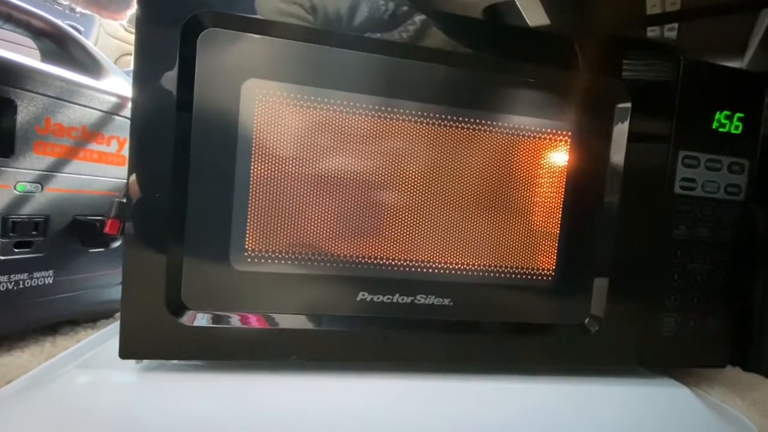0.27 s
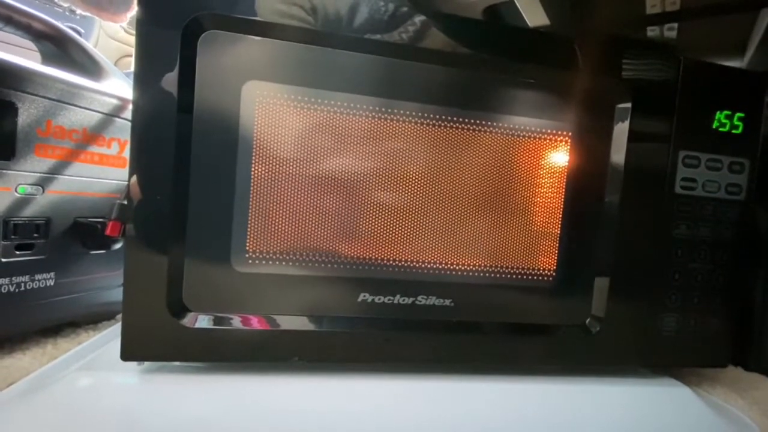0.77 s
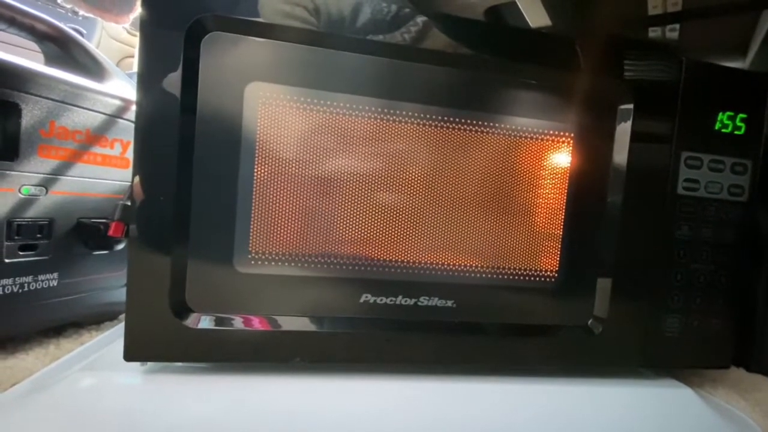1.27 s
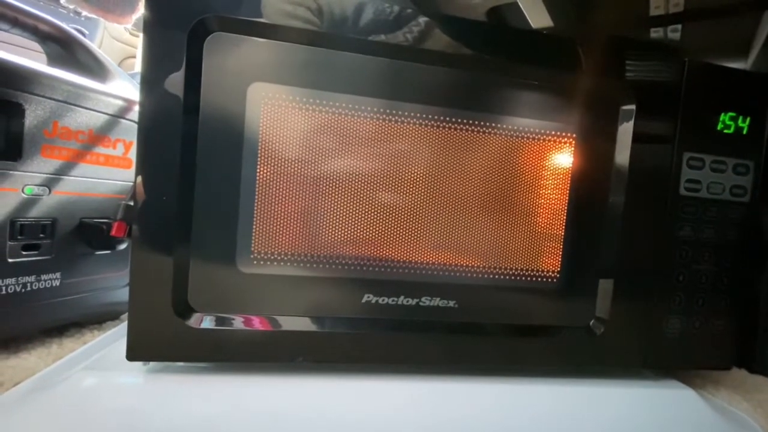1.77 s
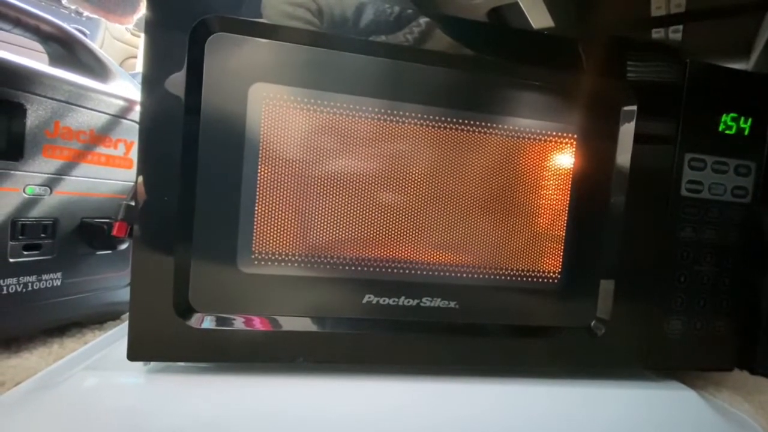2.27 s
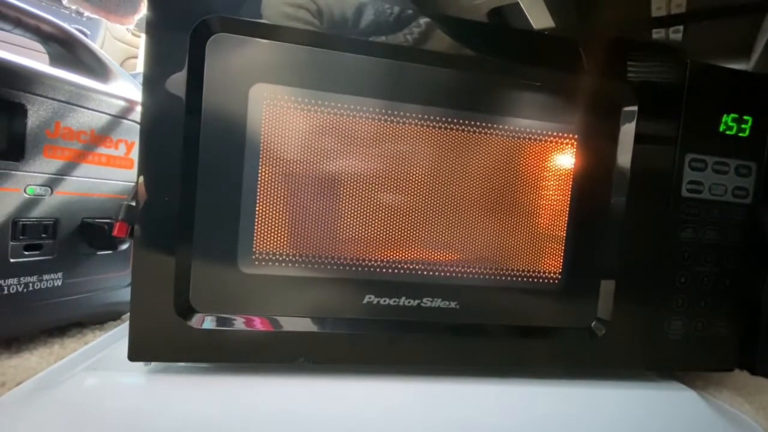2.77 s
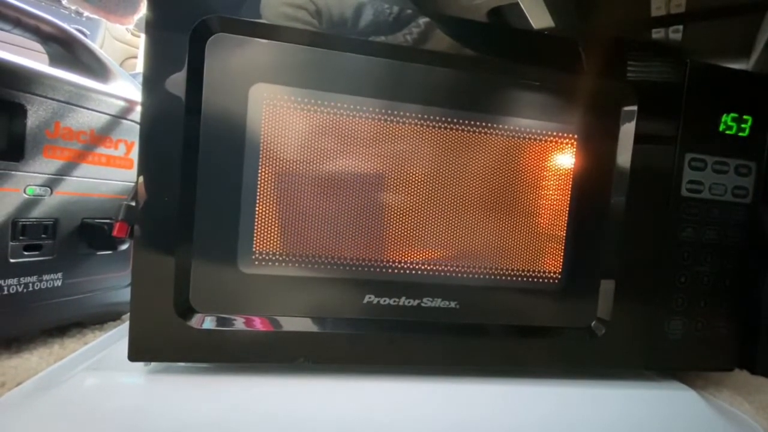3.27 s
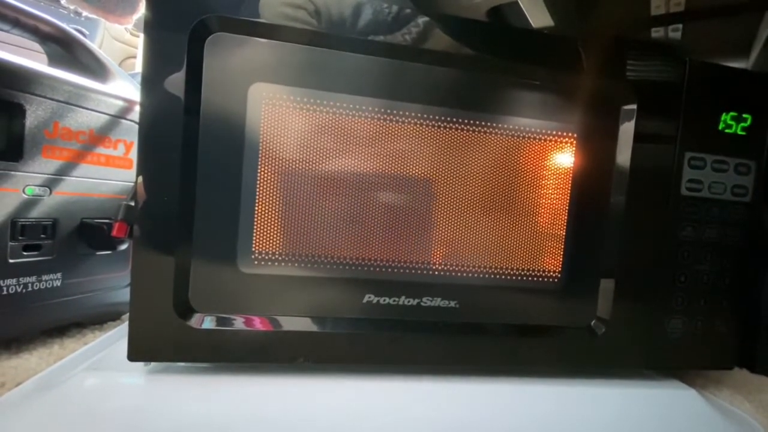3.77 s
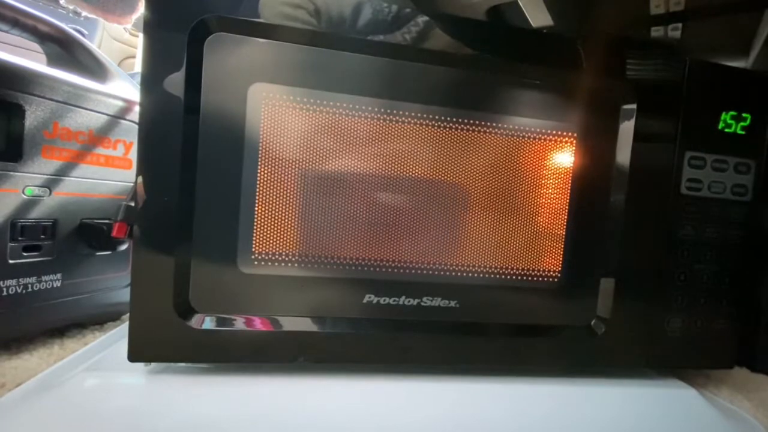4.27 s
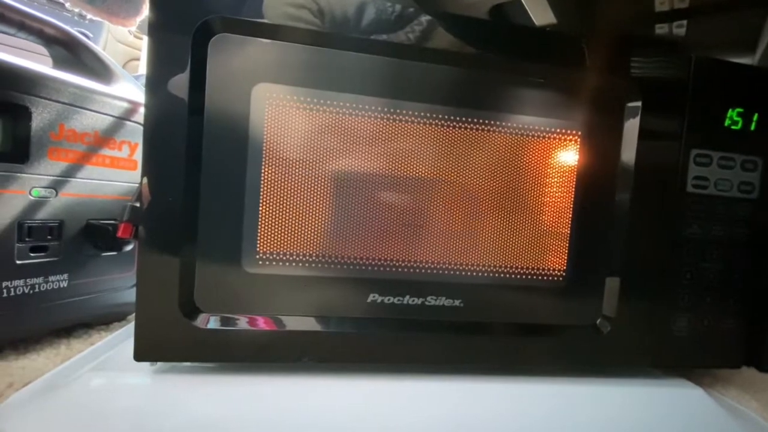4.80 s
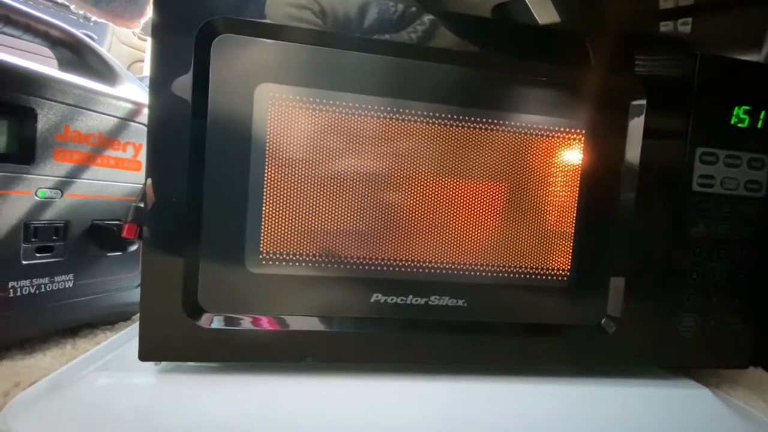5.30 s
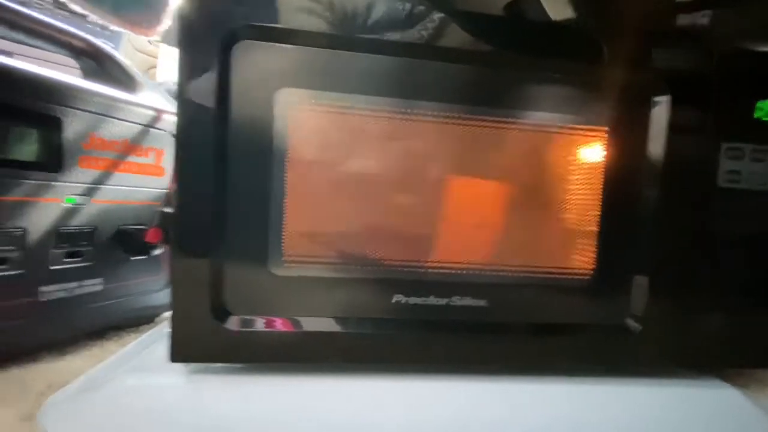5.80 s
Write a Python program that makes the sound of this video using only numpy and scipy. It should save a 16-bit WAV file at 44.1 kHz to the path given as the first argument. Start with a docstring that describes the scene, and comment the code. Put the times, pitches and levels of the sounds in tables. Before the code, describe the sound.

Steady low electrical hum and hollow fan airflow from a microwave fill a cramped van interior, unbroken from start to finish. Over it lie very quiet, bright rustles like fabric or thin wrapping near the microphone, a brief pair of dull clunks from the dish on the turntable just after two seconds, a few sharp little ticks, and a weaker clunk at about five and a half seconds as rustling returns.

```python
"""A microwave oven runs in a small van on a battery inverter, heard in stereo for six seconds.
From the start: a transformer hum built from sines, unsteady fan tones, air noise shaped from random noise,
and a faint rustle of tiny random grains that swells four times, first at about 1.5 s.
From 1.7 s come soft hollow thuds (fading sines with dull noise), from 2.1 s knocks of the dish on the
turntable (a rattle driving damped resonances), and from 2.2 s sharp ticks (short noise bursts)."""
import sys
import numpy as np
from scipy import signal
from scipy.fft import rfft, irfft, next_fast_len
from scipy.io import wavfile

SR = 44100
rng = np.random.default_rng(int(sys.argv[2]) if len(sys.argv) > 2 else 0)


def field_ratio(decibels):
    """Amplitude ratio for a level in dB (20 dB per decade); scalars and array-likes work."""
    return 10 ** (np.asarray(decibels, dtype=float) / 20)


def transcribe(u):
    """Save the signal u as a 16-bit wav file named by the first command-line argument.

    u: samples, shape (n,) or (channels, n), limited to [-1, 1]; the rate is SR.
    q: integer samples, one column per channel.
    """
    v = np.clip(np.atleast_2d(u).T, -1, 1)
    q = np.round(v * 32767).astype(np.int16)
    wavfile.write(sys.argv[1], SR, q)


N = 266628   # length [samples]

MAINS_HZ, FAN_HZ = 60.43, 129.59   # mains pitch, and the base pitch of the small fan
# In the tables, "left lead" is how far the left side's wave runs ahead of the right's.
# transformer and inverter hum:
# (multiple of mains, left level [dB rms], left minus right [dB], left lead [rad])
HUM_HARMONICS = [(1, -63.9, -5.5, 0.43), (2, -35.0, -1.5, -0.01), (3, -50.7, 1.1, 0.51),
                 (4, -63.0, -2.0, 0.16), (5, -64.0, -1.0, 2.13), (6, -60.1, 7.9, -2.65),
                 (8, -59.3, 2.5, 1.65), (22, -76.9, -2.5, 3.03), (25, -77.0, -0.2, -2.57),
                 (27, -80.3, -6.6, 0.74), (28, -70.8, 2.4, 0.76), (31, -72.5, 13.8, 0.75),
                 (32, -76.3, 5.0, -0.57), (76, -77.2, 20.7, 2.86)]
# small fast fan: (multiple of its base pitch, left level [dB rms], left minus right [dB], left lead [rad])
FAN_HARMONICS = [(6, -55.5, 4.5, -3), (7, -61, 8.5, 2.5), (8, -63, 20, -4), (10, -77, 8, 1),
                 (12, -75, 0.5, 0.5), (14, -74.5, 2, 1), (16, -70.5, 7, 0.6)]
# motor and blade tones:
# (pitch [Hz], left level [dB rms], left minus right [dB], left lead [rad], pitch waver [Hz])
MOTOR_TONES = [(64.79, -65.8, 2.0, -0.02, 0.1), (69.14, -58.6, -0.4, 0.42, 0.1),
               (71.06, -63.0, 0.5, 0.6, 0.1), (93.33, -44.9, 5.7, 0.39, 0.05),
               (97.56, -59.5, 1.3, 0.49, 0.05), (443.25, -60.3, 12.6, 0.71, 0.25),
               (453.07, -58.0, 6.6, 1.82, 1.0), (484.5, -60, 4, 1.95, 1.5),
               (497.06, -46.3, 2.8, 2.03, 0.55), (830, -69, 5, -2.9, 2.0), (968.69, -65.3, 2.5, -2.51, 1.4),
               (993.87, -64.2, 11.1, -2.66, 1.05), (1384.5, -63.3, 3.6, 0.63, 3.2),
               (1451.63, -74.5, 3.5, -0.86, 1.75), (1661.49, -74.1, 9.3, -1.11, 2.8),
               (1570.5, -81, 0, -0.5, 1.5), (1752, -83, 0, -0.5, 1.5), (1936.54, -71.5, 5.7, -0.88, 2.1)]
# air noise before its echoes: (pitch [Hz], left level [dB per Hz], left minus right [dB],
# left lead beyond the travel time [rad], likeness of the two sides [0-1])
AIR_COLOUR = [(31, -88, -1, 3, 0.9), (49, -71.5, 21, 2, 0.64), (69.5, -71.5, -6, -0.9, 0.77),
              (82, -77.5, -9.5, 0.5, 0), (114, -72.5, -2, 0.5, 0.83), (153, -70, 4.5, -0.25, 0.67),
              (202, -69, -2, 0.16, 0.87), (263, -63, -0.8, 0.91, 0.93), (307, -68.0, 5, 1.2, 0.97),
              (400, -70, 3.5, 1.04, 0.98), (443, -70, 5, 0.4, 1), (546, -66, 2.5, 0.68, 1),
              (666, -68, 7.5, 1.52, 0.95), (714, -72.5, 0, 0.65, 0.92), (765, -75.5, 3, 0.67, 0.91),
              (838, -75.5, 4.5, 0.9, 0.84), (950, -79, 6, -0.2, 0.72), (1060, -77, 12.5, -0.1, 0.8),
              (1275, -81, 0, -0.65, 0.81), (1505, -91.5, 3, -0.9, 0.14), (1560, -87, 8, -0.2, 0.36),
              (1740, -93, -3.5, -3.5, 0.4), (1850, -87, 3, 0, 0.5), (2000, -86, 5, -2, 0.15),
              (2180, -91.5, 7, -0.7, 0.73), (2980, -85.5, 7, 0.1, 0.51), (3890, -90, 6.5, -1.3, 0.53),
              (4730, -87.5, 7.5, -0.95, 0.48), (6140, -91, 11, -0.2, 0.53), (7400, -101, 5.5, -0.4, 0),
              (8900, -108, 2, -0.5, 0.55), (10000, -130, 6, -12, 0.5)]
AIR_RIGHT_LAG_S = .00049
# echoes of the air noise off nearby surfaces:
# (microphone [0 left, 1 right], delay [s], strength [share, negative = inverted])
AIR_ECHOES = [(0, 0.00145, 0.11), (0, 0.00112, 0.1), (0, 0.00172, 0.09), (0, 0.00094, 0.07),
              (1, 0.00186, 0.16), (1, 0.00435, 0.12), (1, 0.0033, 0.09), (1, 0.00122, -0.09)]
# swells of the rustle: (time of peak [s], peak level [dB rms], rise [dB per s], fall [dB per s])
RUSTLE_SWELLS = [(1.55, -62, 22, 20), (2.35, -73, 12, 20), (3.3, -66, 19, 4), (6.04, -69, 22, 10)]
RUSTLE_REST_DB = -70.5   # faint steady rustle under the swells
# colour of the rustle: (pitch [Hz], relative level [dB per Hz])
RUSTLE_TINT = [(3500, -18), (5000, -1), (7000, 1.5), (9300, 0), (10200, 1), (11300, -5.5), (14100, -2.5),
               (14600, -8), (15500, -7)]
# The right's phase falls behind above this pitch and runs ahead, half as steeply, below it.
RUSTLE_SLOPE_S, RUSTLE_IN_STEP_HZ = .000272, 10150   # slope [turns per Hz, that is s]
# hollow body of the knocks: (start [s], strength before shaping [dB], pitch [Hz])
HOLLOW_THUDS = [(1.725, -50, 1030), (2.112, -44.5, 865), (2.118, -46, 1010), (2.196, -41.5, 1105),
                (5.588, -45.5, 805), (5.588, -42.5, 905), (5.9, -50, 905)]
# dish on the turntable: (time [s], strength [dB], brightness tilt around 2 kHz [dB per octave])
DISH_KNOCKS = [(2.1078, -42.5, 0.5), (2.1925, -43, -4), (5.593, -48.5, -3)]
# resonances of the dish: (pitch [Hz], typical relative level [dB], time to fade by 60 dB [s])
DISH_MODES = [(1450, -5, .015), (1916, -1, .02), (2250, 2, .022), (2660, -4, .02), (2835, -1, .03),
              (3330, 0, .03), (3500, -1, .02), (4135, -3, .02), (4600, -5, .018)]
# sharp ticks in the rustle: (start [s], level before shaping [dB rms], centre pitch [Hz])
RUSTLE_TICKS = [(2.224, -57, 8400), (2.329, -65, 10000), (2.44, -67, 8500), (3.253, -54, 5530),
                (3.932, -62, 6050), (5.85, -65, 8000)]


def rms_one(x):
    """Scale to an average strength (rms) of 1."""
    return x / np.sqrt(np.mean(x ** 2) + 1e-20)


def band(x, low_hz, high_hz):
    """Keep mainly the sound between two pitches."""
    return signal.sosfilt(signal.butter(2, [low_hz, high_hz], "band", fs=SR, output="sos"), x)


def drift(rate_hz):
    """Slow random wandering around 0 with spread 1: noise smoothed twice, one value every 100 samples."""
    r = np.exp(-200 * np.pi * rate_hz / SR)
    noise = rng.standard_normal(N // 100 + 1002)
    slow = signal.lfilter([1], [1, -2 * r, r * r], noise)[1000:]   # skip the filter's warm-up
    return np.interp(np.arange(N) / 100, np.arange(len(slow)), rms_one(slow - slow.mean()))


def turning(hz):
    """Add up a pitch curve into the running angle of a wave [rad]."""
    return 2 * np.pi * np.cumsum(hz + np.zeros(N)) / SR


def tone(phase, left_db, pan_db, lead):
    """A sine as each microphone hears it, with its own level and timing on each side."""
    start = rng.uniform(0, 2 * np.pi)
    sides = np.sin(phase + start - np.array([[0], [lead]]))
    return np.sqrt(2) * field_ratio(left_db - np.array([[0], [pan_db]])) * sides


def ring(x, hz, t60):
    """A damped resonance set ringing by x; a unit click gives height 1."""
    r, w = field_ratio(-60 / (t60 * SR)), 2 * np.pi * hz / SR
    return signal.lfilter([0, np.sin(w)], [1, -2 * r * np.cos(w), r * r], x + 1e-18)


def panned(x, pan_db):
    """Make the left louder than the right by pan_db, split evenly."""
    return x * field_ratio(np.array([[pan_db / 2], [-pan_db / 2]]))


def hum(swell_db):
    """The iron core buzzes on exact multiples of the mains, all swelling slightly together."""
    phase = turning(MAINS_HZ)
    buzz = sum(tone(k * phase, *rest) for k, *rest in HUM_HARMONICS)
    return field_ratio(swell_db * drift(0.26)) * buzz


def fans(speed_waver, flicker_db):
    """Multiples of the small fan share one unsteady speed; other tones waver alone; every level flickers."""
    phase = turning(FAN_HZ * (1 + speed_waver * drift(1.12)))
    out = np.zeros((2, N))
    for k, *rest in FAN_HARMONICS:
        out += field_ratio(flicker_db * drift(2.3)) * tone(round(k) * phase, *rest)
    for hz, *rest, waver_hz in MOTOR_TONES:
        flicker = field_ratio(min(waver_hz, 1) * flicker_db * drift(1.4))   # steadier pitch, steadier level
        out += flicker * tone(turning(hz + waver_hz * drift(2.18)), *rest)
    return out


def air(gust_db, patchy_db):
    """Turbulent air: noise partly shared by both sides, late on the right, with echoes on each side."""
    size = next_fast_len(N)
    hz = np.arange(1, size // 2 + 2) * SR / size
    at, *columns = np.transpose(AIR_COLOUR)
    left_db, pan_db, lead, alike = [np.interp(np.log(hz), np.log(at), c) for c in columns]
    alike = np.clip(alike, 0, 1)
    left, other = rfft(rng.standard_normal((2, size)))
    late = np.exp(-1j * (lead + 2 * np.pi * hz * AIR_RIGHT_LAG_S))
    right = (alike * late * left + np.sqrt(1 - alike ** 2) * other) * field_ratio(-pan_db)
    sides = np.array([left, right])
    mirrored = hz ** 4 / (hz ** 4 + 2000.0 ** 4)   # small surfaces send back mostly the treble
    for side, delay_s, strength in AIR_ECHOES:
        sides[int(side)] *= 1 + strength * mirrored * np.exp(-2j * np.pi * hz * delay_s)
    coloured = sides * field_ratio(left_db) * np.sqrt(SR / 2)
    octave = np.clip(np.log2(hz / 150), 0, 4)
    out = np.zeros((2, N))
    for k in range(5):   # overlapping octaves, each drifting in level on its own
        share = np.maximum(1 - abs(octave - k), 0)
        out += field_ratio(patchy_db * drift(.7)) * irfft(coloured * share, size)[:, :N]
    return out * field_ratio(gust_db * (drift(23.0) + 0.3 * drift(0.64)))


def rustle(grains_per_s, spread_db, alike, clump_db):
    """Dense uneven grains in the treble, coming in clumps; each swell rises and falls steadily in dB."""
    t, size = np.arange(N) / SR, next_fast_len(N)
    swells = np.zeros(N)
    for s, db, rise_db, fall_db in RUSTLE_SWELLS:
        swells += field_ratio(db - np.maximum(rise_db * (s - t), fall_db * (t - s)))
    born = rng.random((2, N)) < grains_per_s / SR
    sizes = field_ratio(spread_db * np.minimum(rng.exponential(1, (2, N)), 3))
    left, other = rfft(born * rng.standard_normal((2, N)) * sizes, size)
    hz = np.arange(1, size // 2 + 2) * SR / size
    above = hz - RUSTLE_IN_STEP_HZ
    turned = np.exp(-2j * np.pi * RUSTLE_SLOPE_S * np.maximum(above, above / 2))
    alike = min(alike, 1)
    right = alike * turned * left + np.sqrt(1 - alike ** 2) * other
    at, db = np.transpose(RUSTLE_TINT)
    colour = field_ratio(np.interp(np.log(hz), np.log(at), db, left=-80))
    grains = irfft(np.array([left, right]) * colour, size)[:, :N]
    level = np.hypot(swells, field_ratio(RUSTLE_REST_DB))
    return level * field_ratio(clump_db * drift(21)) * rms_one(grains)


def thuds(rise_s, t60, pan_db, lead, width_hz, noise_db):
    """A low resonance that builds up over a few cycles and soon dies, mixed with dull noise."""
    out, t = np.zeros((2, N)), np.arange(SR // 8) / SR
    for s, strength_db, hz in HOLLOW_THUDS:
        phase = 2 * np.pi * hz * t + rng.uniform(0, 2 * np.pi) - np.array([[0], [lead]])
        dull = rms_one(band(rng.standard_normal(len(t)), hz - width_hz, hz + width_hz))
        at = round(s * SR)
        shape = field_ratio(strength_db - 60 * t / t60) * (1 - np.exp(-t / rise_s))
        out[:, at:at + len(t)] += shape * (np.sin(phase) + field_ratio(noise_db) * dull)
    return panned(out, pan_db)


def knocks(contact_s, pan_db, unlike):
    """A rattling contact drives the damped resonances of the dish, with new strengths each time."""
    out, t = np.zeros((2, N)), np.arange(SR // 4) / SR
    for s, strength_db, tilt_db in DISH_KNOCKS:
        rattle = rng.standard_normal(len(t)) + unlike * rng.standard_normal((2, len(t)))
        rattle *= np.exp(-t / contact_s) / np.sqrt(contact_s * SR)
        body = np.zeros((2, len(t)))
        for hz, db, t60 in DISH_MODES:
            mode_db = db + tilt_db * np.log2(hz / 2000) + rng.normal(0, 1.2)
            body += field_ratio(mode_db) * ring(rattle, hz, t60)
        at = round((s - .002) * SR)   # contact begins 2 ms ahead of the listed time
        out[:, at:at + len(t)] += field_ratio(strength_db) * band(body, 700, 5200)
    return panned(out, pan_db)


def ticks(rise_s, t60, width_hz):
    """A soft-edged burst of noise around its own pitch, fading gradually and cut off after 0.1 s."""
    out, t = np.zeros((2, N)), np.arange(SR // 10) / SR
    for s, level_db, hz in RUSTLE_TICKS:
        burst = rng.standard_normal((2, len(t)))
        for _ in range(2):   # filtered twice to cut off other pitches more steeply
            burst = band(burst, hz - width_hz, hz + width_hz)
        at = round(s * SR)
        shape = field_ratio(level_db - 60 * t / t60) * (1 - np.exp(-t / rise_s))
        out[:, at:at + len(t)] += shape * rms_one(burst)
    return out


def scene():
    """Hum, fans and air of the oven, with the small sounds around it."""
    oven = hum(swell_db=-0.36) + fans(speed_waver=0.00147, flicker_db=1.2)
    oven += air(gust_db=.45, patchy_db=.7)
    near = rustle(grains_per_s=10000, spread_db=2.5, alike=1.0, clump_db=2.05)
    dish = thuds(rise_s=0.01, t60=0.11, pan_db=3, lead=0.3, width_hz=300, noise_db=-5)
    dish += knocks(contact_s=0.02, pan_db=6.5, unlike=0.29)
    near += ticks(rise_s=0.00051, t60=0.39, width_hz=1600)
    return oven + near + dish


def band_limit(x):
    """A steep low-pass at the top of the band."""
    return signal.sosfilt(signal.butter(12, 15750, fs=SR, output="sos"), x)


def record(dry):
    """The finished scene goes through the last step of the chain."""
    return band_limit(dry)


dry = scene()
out = record(dry)
transcribe(out)
```